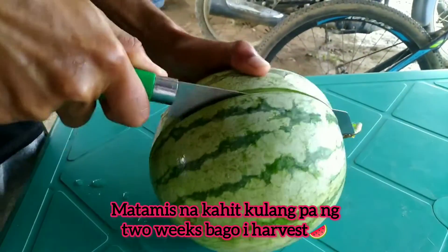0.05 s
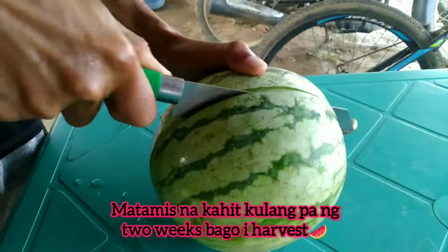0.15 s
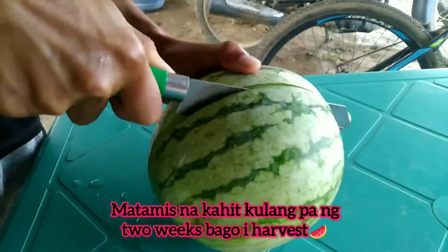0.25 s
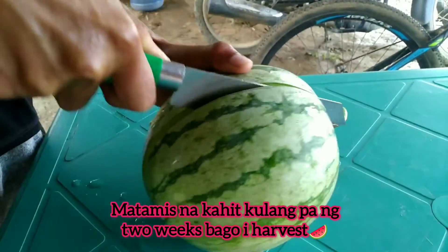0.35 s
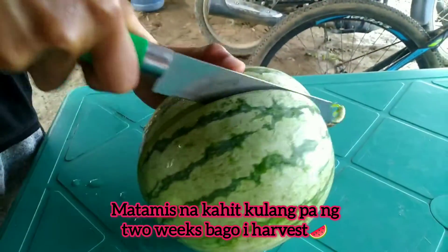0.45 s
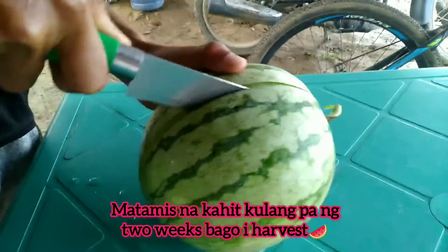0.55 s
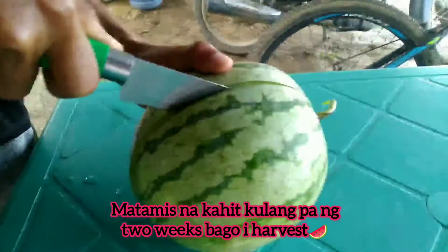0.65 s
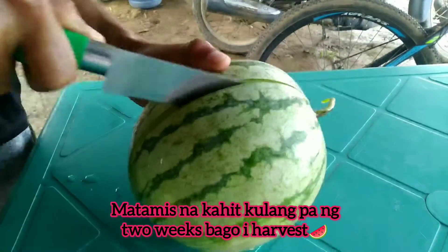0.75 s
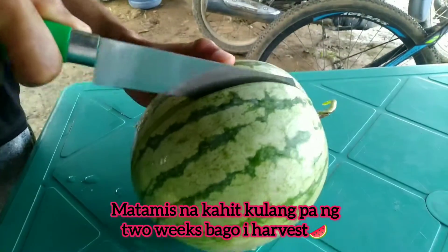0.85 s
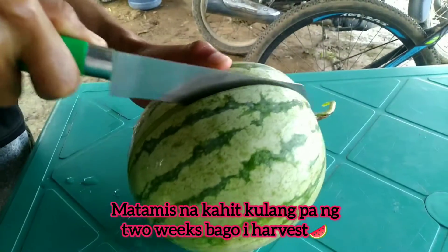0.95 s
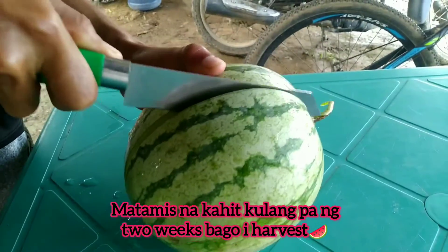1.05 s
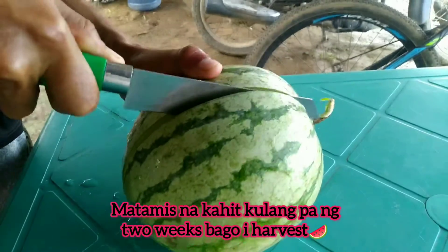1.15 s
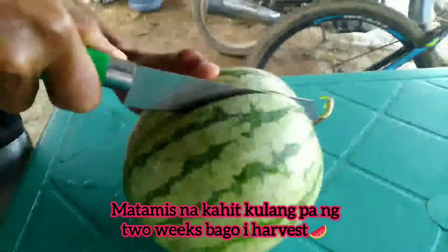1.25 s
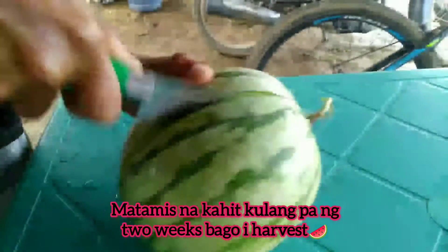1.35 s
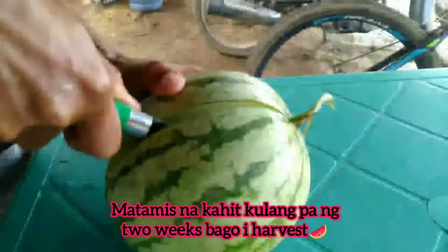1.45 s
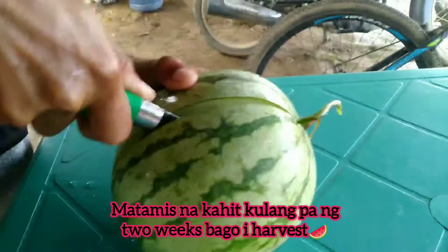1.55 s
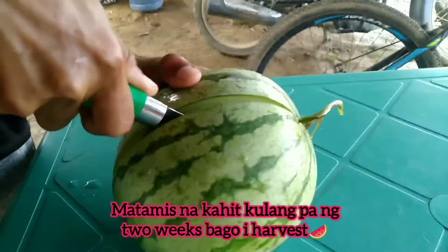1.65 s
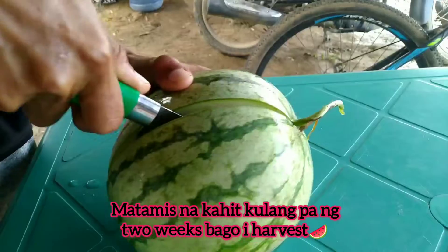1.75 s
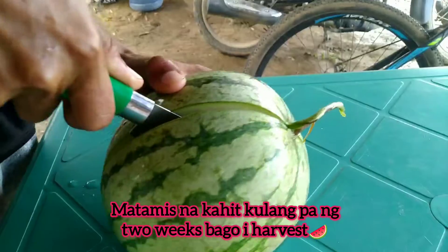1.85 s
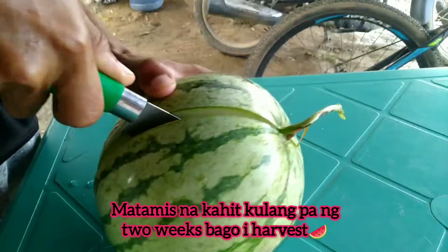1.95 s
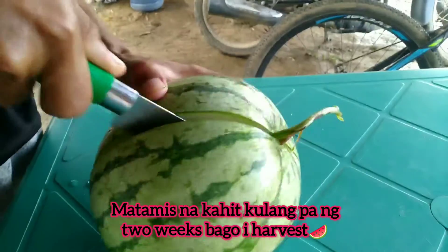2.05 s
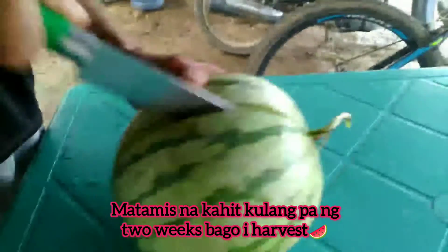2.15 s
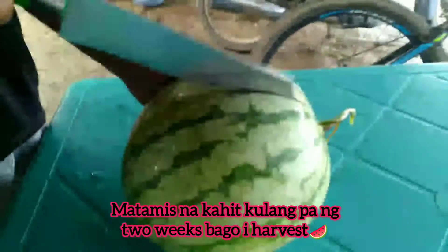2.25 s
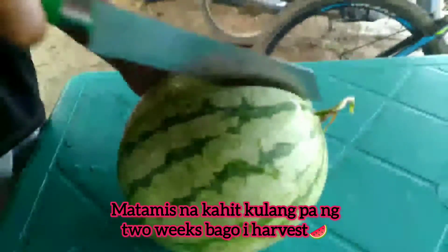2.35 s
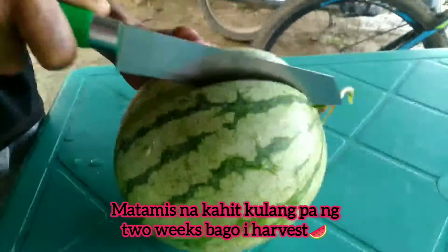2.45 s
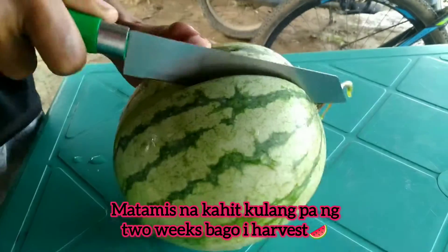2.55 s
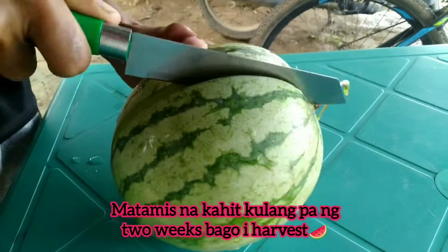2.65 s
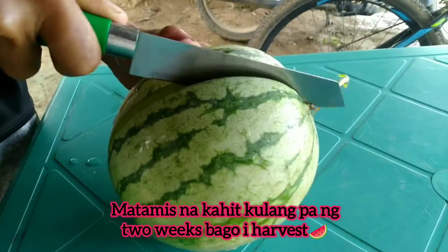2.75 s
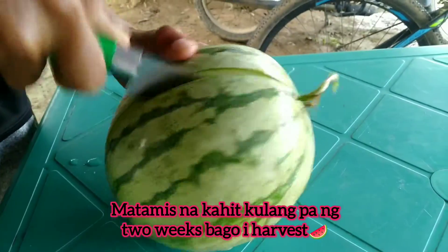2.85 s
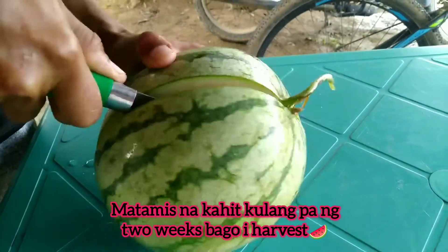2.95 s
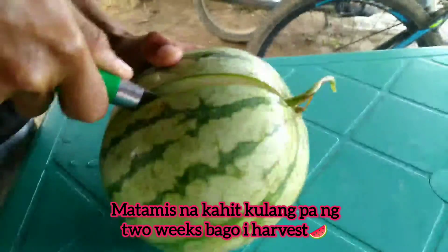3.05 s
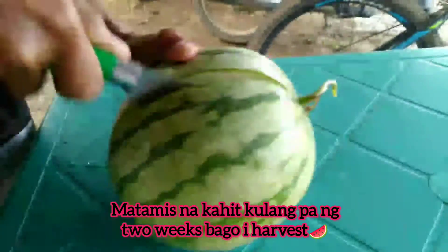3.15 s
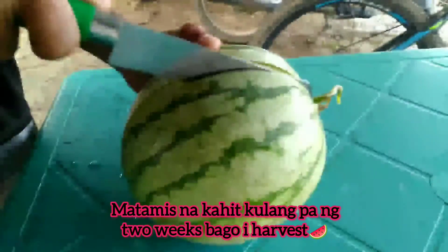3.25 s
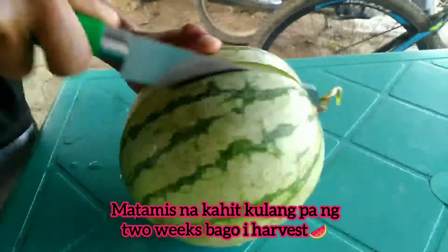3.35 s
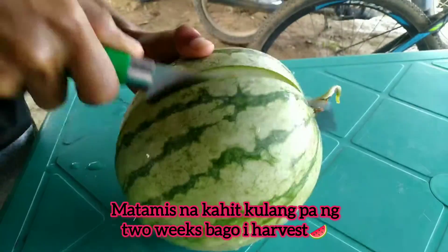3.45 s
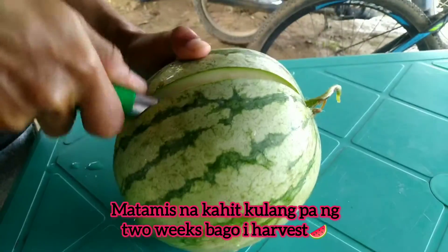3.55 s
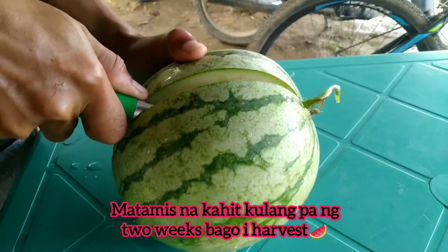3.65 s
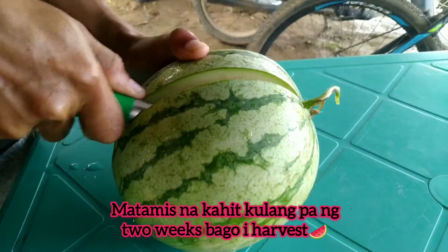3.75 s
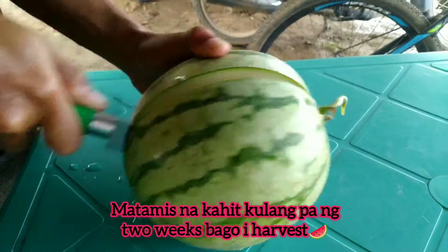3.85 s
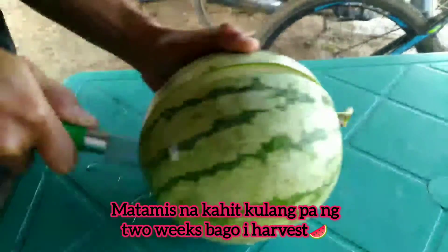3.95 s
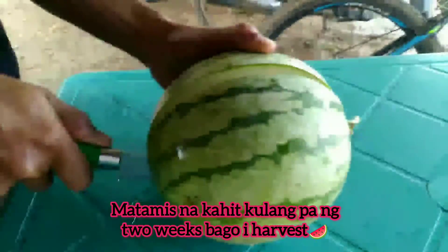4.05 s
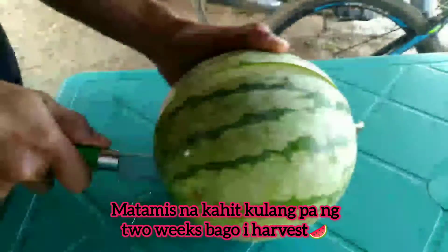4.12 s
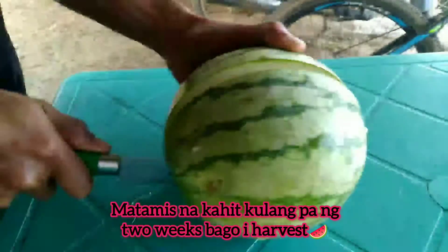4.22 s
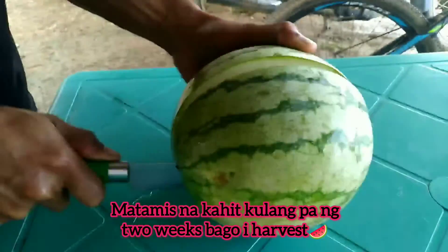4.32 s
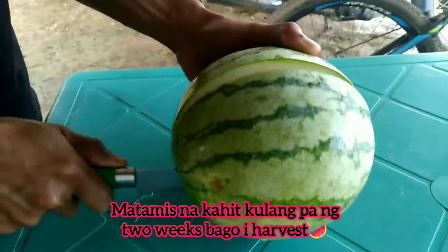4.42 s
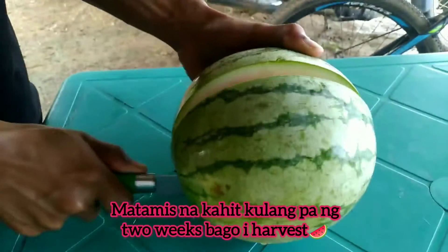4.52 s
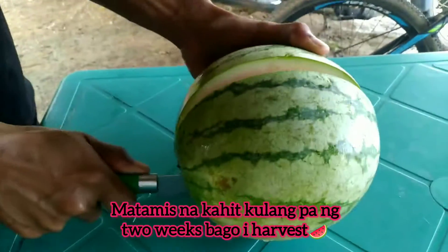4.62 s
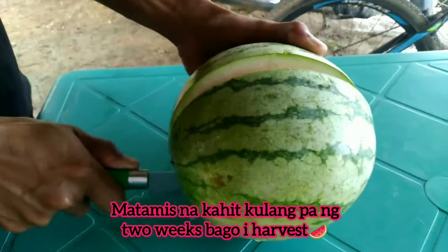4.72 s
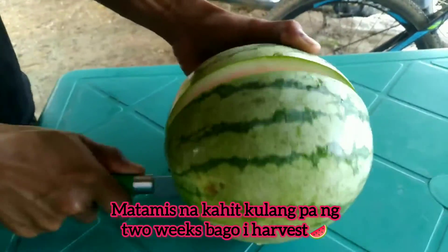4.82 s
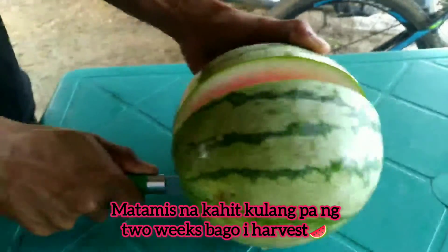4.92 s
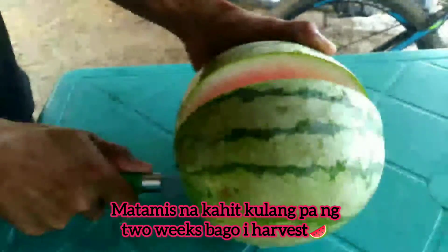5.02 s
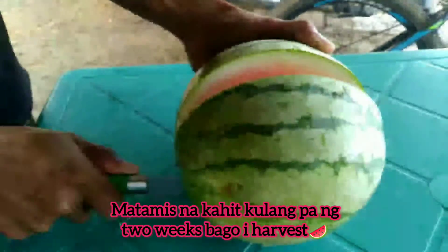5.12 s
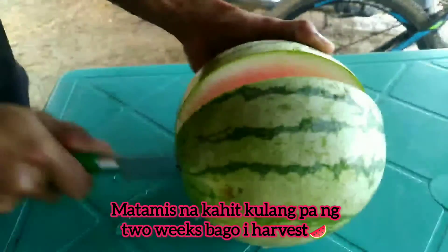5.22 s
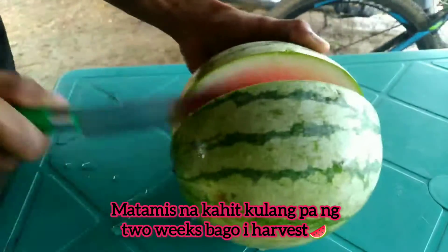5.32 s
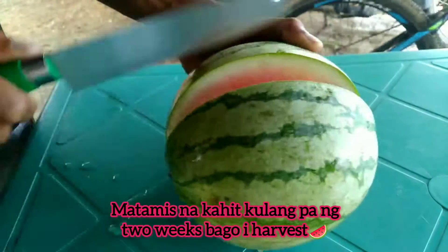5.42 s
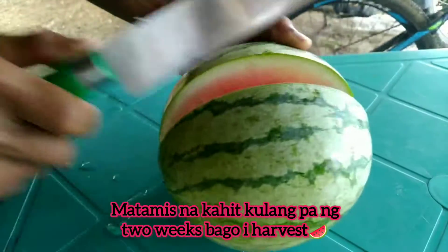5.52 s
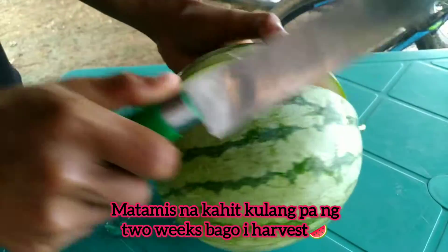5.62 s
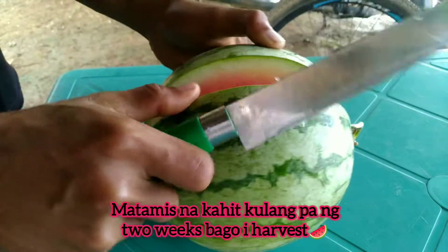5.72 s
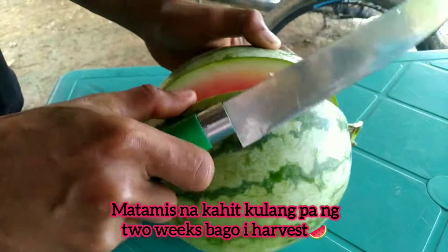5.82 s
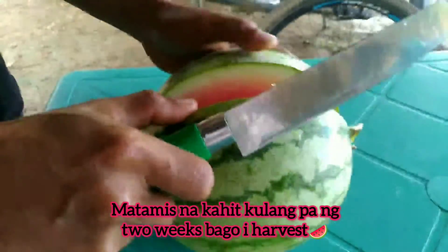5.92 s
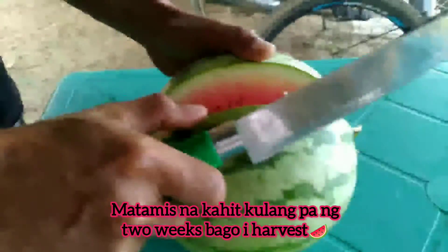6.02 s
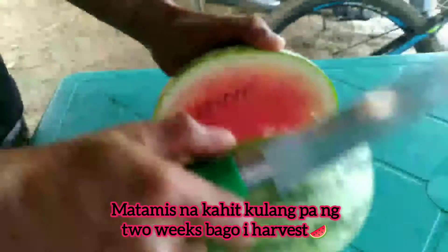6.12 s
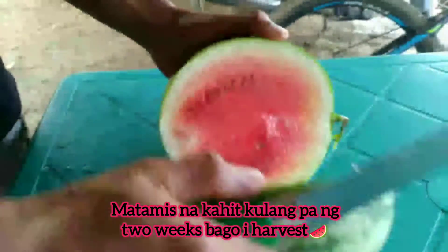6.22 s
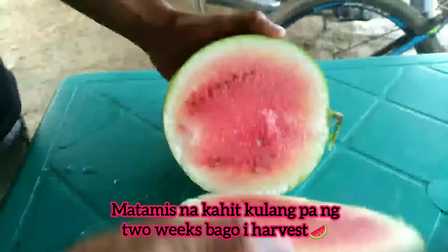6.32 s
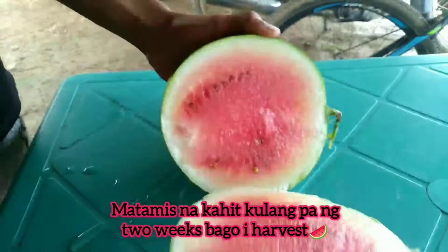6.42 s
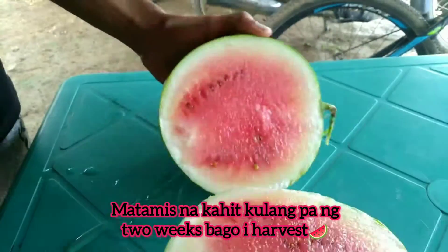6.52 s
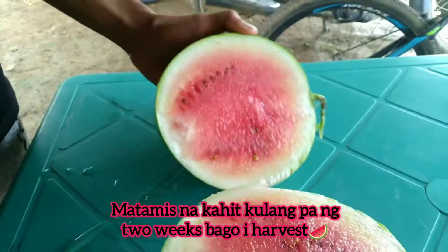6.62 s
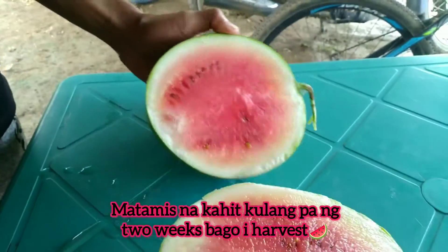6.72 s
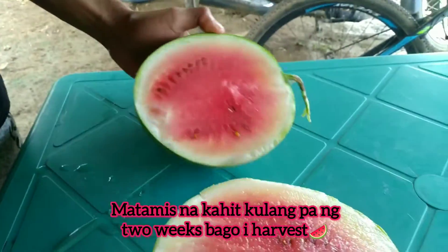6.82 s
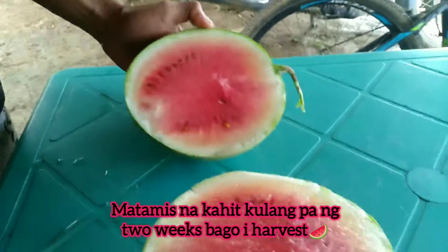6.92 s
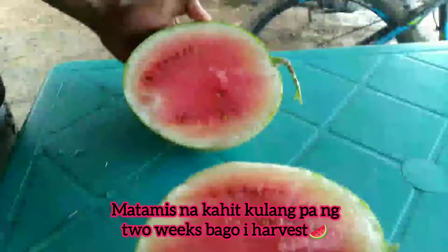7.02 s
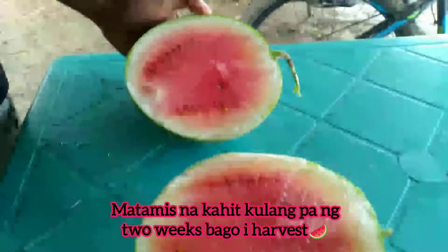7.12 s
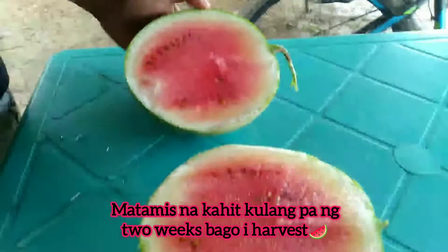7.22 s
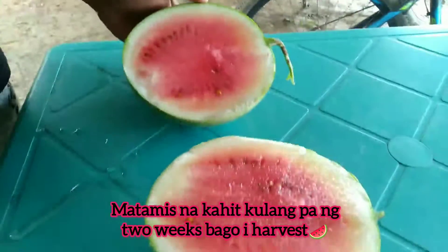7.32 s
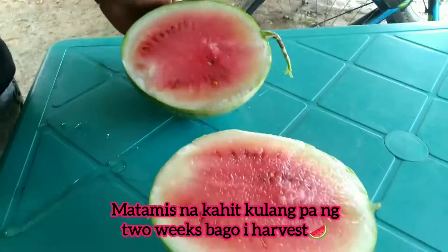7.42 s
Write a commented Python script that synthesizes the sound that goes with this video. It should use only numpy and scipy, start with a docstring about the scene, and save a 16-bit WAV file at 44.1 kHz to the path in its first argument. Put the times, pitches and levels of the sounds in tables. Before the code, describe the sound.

Close up, a kitchen knife rubs through a watermelon on a plastic table: faint scrapes, then crisp snaps and short wet crunches around one and a half and three seconds. Steadier soft rasping follows, then a long crackling split just after six seconds with hollow thuds and small wet ticks. A single-cylinder engine idles low in the distance under a porch, near stereo microphone.

```python
"""Under a porch roof, a kitchen knife is worked through a whole watermelon on a plastic table.
The blade rubs by stick-slip friction in the wet rind; swarms of fractures and single snaps open it,
and each crack excites the modes of fruit and table until the melon splits and the wet halves tick apart.
Some way off a single-cylinder engine idles as a sum of exhaust orders with clatter, behind it lies
the coloured noise of open air, and once a thin, faint sine whistles in the distance."""
import sys
import numpy as np
from scipy import signal
from scipy.fft import rfft, irfft
from scipy.io import wavfile
from scipy.ndimage import uniform_filter1d

SR = 44100
rng = np.random.default_rng(int(sys.argv[2]) if len(sys.argv) > 2 else 0)


def store_wav(level_fs):
    """Save 16-bit WAV to argv[1]."""
    pcm = np.round(np.clip(np.atleast_2d(level_fs), -1, 1) * 32767)
    wavfile.write(sys.argv[1], SR, pcm.T.astype(np.int16))


N = 329418

# A colour that leaves the spectrum unchanged. Each row: frequency in Hz, gain in dB.
FLAT = [(1000, 0)]
CUTOFF_HZ = 15800


def from_db(db):
    """Level and amplitude: 20 dB is a factor of ten in gain."""
    return 10 ** (np.asarray(db) / 20)


def rms_one(x):
    """Normalization: scale to rms 1."""
    return x / np.sqrt(np.mean(x ** 2) + 1e-20)


def band(x, hz, kind):
    """Butterworth filtering, from a second-order prototype."""
    return signal.sosfilt(signal.butter(2, hz, kind, fs=SR, output="sos"), x + 1e-18)


def colour(x, points, size=8192):
    """Minimum phase: folding the cepstrum makes a causal filter through (Hz, dB) points."""
    hz, db = np.transpose(points)
    grid = np.maximum(np.fft.rfftfreq(size, 1 / SR), 1)
    gain = from_db(np.interp(np.log(grid), np.log(hz), db))
    cepstrum = irfft(np.log(gain))
    cepstrum[1:size // 2] *= 2
    cepstrum[size // 2 + 1:] = 0
    response = irfft(np.exp(rfft(cepstrum)))
    return signal.oaconvolve(x, response)[:N]


def stereo(pair, points):
    """Decorrelation: mid and side come from unrelated signals and treble scattered by hand and table."""
    # Ratio of side to mid at the microphone ports. Each row: frequency in Hz, side minus mid in dB.
    widths = [(200, -19), (700, -8), (1300, -3), (2400, -1), (4400, 0)]
    scatter = rms_one(rng.standard_normal(SR // 200)) / np.sqrt(SR // 100)
    scattered_treble = band(signal.oaconvolve(pair[0], scatter)[:N], 1800, "high")
    side = scattered_treble + pair[1] * np.sqrt(.5)
    mid, side = colour(pair[0], points), colour(colour(side, widths), points)
    return np.array([mid + side, mid - side])


def drift(rate, count=4000):
    """Slow random fluctuation: straight lines join normal draws made rate times per second."""
    return np.interp(np.arange(N) / SR * rate, np.arange(count), rng.standard_normal(count))


def ring(force, hz, t60):
    """Damped resonance: a unit click sets a sine ringing from height 1."""
    r = from_db(-60 / (t60 * SR))
    w = 2 * np.pi * hz / SR
    return signal.lfilter([0, np.sin(w)], [1, -2 * r * np.cos(w), r * r], force + 1e-18)


def body(force):
    """Modal superposition: fruit and table answer a force with damped modes of alternating sign."""
    # Modes of melon and table top together. Each row: frequency in Hz, gain in dB, 60 dB decay in seconds.
    modes = [(87, 3.5, 0.028), (99.8, 3, 0.27), (148.7, -4, 0.28), (185, -1, 0.27), (226.4, 0.5, 0.23),
             (260, -5, 0.12), (322, -1.5, 0.16), (396, -12, 0.2), (662, -2.5, 0.055)]
    return sum((-1) ** k * from_db(db) * ring(force, hz, t60) for k, (hz, db, t60) in enumerate(modes))


def envelope(start, rise, hold, release_db_per_s, sag_db_per_s=0):
    """Growth and decay: a near-linear swell, a sagging hold, then an exponential release."""
    swell_power = 0.99
    age = np.maximum(np.arange(N) / SR - start, 0)
    swell = np.minimum(age / max(rise, .001), 1) ** swell_power
    sag_db = sag_db_per_s * np.clip(age - rise, 0, hold)
    release_db = release_db_per_s * np.clip(age - rise - hold, 0, 1)
    return swell * from_db(-sag_db - release_db)


def air(air_db=-54.0):
    """Broadband noise: filtering gives a distant outdoor rumble and a faint hiss."""
    # Spectrum of the open air. Each row: frequency in Hz, gain in dB per Hz.
    air_colour = [(50, -9.5), (100, 7.5), (200, 2.5), (320, -7), (700, -4), (1000, -11.5), (2000, -18),
                  (6500, -29), (10500, -24.5), (15500, -31)]
    return from_db(air_db) * rms_one(stereo(rng.standard_normal((2, N)), air_colour))


def whistle():
    """Pure tone: a thin far sine swells and fades over half a sine cycle."""
    start_s, length_s, level_db, pitch_hz = 6.6, 0.51, -71, 3600
    t = np.arange(N) / SR
    swell = np.sin(np.pi * np.clip((t - start_s) / length_s, 0, 1))
    return from_db(level_db) * swell * np.sin(2 * np.pi * pitch_hz * t)


def engine(throb=0.048, regular_db=0, load_db_per_hz=1.5):
    """Periodic excitation: one cylinder makes exhaust orders and clatter, louder as it runs faster."""
    # Course of the idling speed. Each row: time in seconds, firings per second.
    idle = [(0.0, 20.2), (0.421, 20.5), (1.541, 19.5), (1.869, 20.2), (2.678, 19.3), (5.6, 18.2),
            (5.931, 18.8), (7.47, 18.9)]
    # Exhaust orders from twice the firing rate upwards. Each entry: relative level in dB.
    exhaust_orders = [-61.5, -53.5, -51.5, -60.5, -57, -75.5]
    # Resonances of the clatter. Each row: frequency in Hz, width in Hz, relative level in dB.
    clatter_modes = [(436, 76, -64.5), (641, 49, -63)]
    rate = np.interp(np.arange(N) / SR, *np.transpose(idle))
    cycles = np.cumsum(rate) / SR + 0.012 * drift(18)
    turn = 2 * np.pi * cycles
    exhaust = 0
    for k, db in enumerate(exhaust_orders, 2):
        # the pipe delays the high orders, which smears each thump; each order wavers in level
        wave = np.cos(k * turn - 0.614 * k * k)
        exhaust = exhaust + np.sqrt(2) * from_db(db + drift(2.01)) * wave
    firings = rms_one(np.diff(np.floor(cycles), prepend=0).clip(0))
    puffs = rng.standard_normal((2, N)) * (1 + throb * np.cos(turn))
    force = puffs + from_db(regular_db) * firings
    clatter = 0
    for hz, width, db in clatter_modes:
        t60 = np.log(1000) / (np.pi * width)
        clatter = clatter + from_db(db) * rms_one(ring(force, hz, t60))
    level = from_db(load_db_per_hz * (rate - rate.mean()) + 1.6 * drift(12))
    return level * (exhaust + stereo(clatter, FLAT))


def porch(x):
    """Reverberation: weak, dull reflections from roof and ground differ at each port."""
    t60_s, level_db, low_hz, cut_hz, first_s = 0.083, -12.5, 155, 10200, .008
    t = np.arange(SR // 2) / SR
    noise = band(rng.standard_normal((2, len(t))), [low_hz, cut_hz], "band")
    tail = noise * from_db(-60 * t / t60_s) * (t > first_s)
    tail /= np.sqrt(np.sum(tail ** 2, axis=1, keepdims=True))
    return x + from_db(level_db) * signal.oaconvolve(x, tail, axes=1)[:, :N]


def knocking(knock_db=-46, thud_db=-2):
    """Forced vibration: the rocking fruit thuds for two soft cycles and wakes modes near that pitch."""
    # Fruit rocking on the table. Each row: start in seconds, relative push in dB, pitch of the push in Hz.
    knocks = [(1.338, -36.5, 138), (1.406, -27.5, 320), (1.455, -32.5, 203), (1.487, -32, 148),
              (1.616, -37.5, 262), (2.201, -42.5, 218), (2.294, -40.5, 223), (2.942, -26.5, 332),
              (2.972, -41, 153), (4.509, -36.5, 197), (4.598, -38, 175), (4.625, -36, 400),
              (4.922, -29, 200), (4.974, -37.5, 198), (6.069, -29, 225), (6.14, -26.5, 109),
              (6.169, -33.5, 125), (6.293, -30.5, 190), (6.8234, -36.5, 423)]
    force = np.zeros(N)
    for s, db, hz in knocks:
        t = np.arange(round(2 * SR / hz)) / SR
        i = round(s * SR)
        force[i:i + len(t)] += from_db(db) * np.sin(2 * np.pi * hz * t) * np.hanning(len(t))
    return from_db(knock_db) * body(force) + from_db(thud_db) * force


def ticking(tick_db=0, ring_s=0.0025, ring_db=-17, spray_s=0.024, spray_db=-37):
    """Impulsive release: a film of juice parts with one sharp click, a brief ring and a faint spray."""
    # Films of juice parting. Each row: start in seconds, relative strength in dB, pitch in Hz.
    ticks = [(0.2227, -11.5, 10700), (0.5807, -24, 11000), (0.796, -19, 5570), (4.508, -16.5, 11300),
             (4.521, -17.5, 11000), (6.733, -21, 11500), (6.7328, -29, 2430), (6.7714, -15.5, 8800),
             (6.843, -24, 10500), (6.943, -21, 2800)]
    t = np.arange(SR // 20) / SR
    decay = from_db(ring_db) * np.exp(-t / ring_s) + from_db(spray_db) * np.exp(-t / spray_s)
    out = np.zeros((2, N))
    for s, db, hz in ticks:
        pop = decay * rng.choice([-1, 1], (2, len(t)))
        pop[0, 0] = 1
        pop = band(pop, [hz / 1.5, min(hz * 1.5, CUTOFF_HZ)], "band")
        i = round(s * SR)
        out[:, i:i + len(t)] += from_db(db + tick_db) * pop / np.linalg.norm(pop[0])
    return stereo(out, FLAT)


def bursting_cells(per_s, spread_db):
    """Shot noise: two streams of random fractures of uneven size, levelled in short-time power."""
    sizes_db = spread_db * np.minimum(rng.exponential(1, (2, N)), 4)
    sizes = from_db(sizes_db) * rng.choice([-1, 1], (2, N))
    clicks = sizes * (rng.random((2, N)) < per_s / SR)
    return clicks / np.sqrt(uniform_filter1d(clicks ** 2, size=900, axis=1) + 1e-6)


def squelching(squelch_db=0, release_db_per_s=560):
    """Cavity collapse: juice pockets burst in a coarse swarm around the pitch of their gap."""
    # Wet flesh squeezed on the blade.
    # Each row: start in seconds, swell in seconds, relative level in dB, pitch in Hz.
    squelches = [(0.222, 0.023, -53, 1640), (1.482, 0.01, -36.5, 556), (1.609, 0.0038, -47, 910),
                 (2.868, 0.014, -34.5, 950), (2.89, 0.0062, -35, 400), (2.923, 0.01, -35.5, 825),
                 (4.26, 0.04, -51, 1280)]
    cells, out = bursting_cells(per_s=1300, spread_db=2.5), 0
    for start, swell, db, hz in squelches:
        juice = rms_one(band(cells, [hz / 1.4, hz * 1.4], "band"))
        out = out + from_db(db + squelch_db) * juice * envelope(start, swell, 0, release_db_per_s)
    return stereo(out, FLAT)


def snapping(crack_s=0.0015, tail_s=0.023, tail_db=-20, echo_s=.0057, echo_db=-10, crack_db=12,
             click_db=-1, ring_cycles=5.66, boom_db=-28, splinter_db=-4):
    """Dispersion: a bright click bounces off the table, and a woody crack bends the rind."""
    # Single snaps of the rind. Each row: start in seconds, relative levels of click and woody crack in dB.
    snaps = [(0.164,-38,-37), (0.243,-35,-37), (1.335,-19.5,-26), (1.4037,-33,-17), (1.6145,-60,-45),
             (2.1975,-21.5,-32.5), (2.868,-20,-42), (2.879,-16,-45), (2.9323,-28,-23.5), (2.942,-21.5,-20),
             (4.582,-28,-34.5), (4.9215,-22,-22), (4.974,-25.5,-30), (6.0415,-23,-16), (6.0684,-10.5,-17),
             (6.0945,-21,-15.5), (6.104,-18,-23), (6.1144,-22,-18.5), (6.142,-35,-15), (6.1698,-33,-17.5),
             (6.177,-22,-19.5), (6.2314,-38,-23.5), (6.2389,-37,-29), (6.2623,-34,-32), (6.2912,-30,-32.5)]
    # Spectrum of the snaps. Each row: frequency in Hz, gain in dB per Hz.
    snap_colour = [(450, -14), (2300, -4), (3300, -8), (5500, -2.5), (11000, -3), (15500, -10)]
    bend_lag_cycles = 1.2
    t = np.arange(SR // 12) / SR
    click = np.exp(-t / crack_s) + from_db(tail_db) * np.exp(-t / tail_s)
    click += from_db(echo_db) * (t > echo_s) * np.exp(-np.abs(t - echo_s) / (2 * crack_s))
    pitches = 450 * 2 ** np.arange(0, 3.5, .5)  # half-octave steps in Hz
    out, push = np.zeros((2, N)), np.zeros(N)
    for s, bright_db, woody_db in snaps:
        i = round(s * SR)
        splinters = rng.choice([-1, 1], (len(pitches) + 1, 2, len(t)))
        snap = from_db(bright_db + click_db) * band(click * splinters[-1], 3800, "high")
        for hz, grains in zip(pitches, splinters):
            # bending waves are slower at low pitch: the lows come later and last longer
            age = t * hz / ring_cycles
            wave = from_db(splinter_db) * grains * np.sqrt(age) * np.exp(-age)
            wave[:, round(bend_lag_cycles * SR / hz)] += grains[:, 0] * np.sqrt(.5 * SR / hz)
            snap += from_db(woody_db + crack_db) * band(wave, [hz / 1.25, hz * 1.25], "band")
        out[:, i:i + len(t)] += snap
        push[i] += from_db(woody_db + boom_db)
    return stereo(out, snap_colour) + body(push)


def slips(per_s, slip_s, jerk_db):
    """Stick and slip: at uneven moments the level leaps, then sinks back; rms 1."""
    kicks = (rng.random(N) < per_s / SR) * rng.uniform(0.34, 1, N)
    strain = signal.lfilter([1], [1, -np.exp(-1 / (slip_s * SR))], kicks + 1e-18)
    return rms_one(from_db(jerk_db * np.tanh(strain)))


def in_the_cleft(grains, shifts_per_s):
    """Moving resonance: as the contact shifts, each mode of the cut glides, swells and fades alone."""
    # Resonances of the cut. Each entry: frequency in Hz.
    cleft_modes = [840, 1160, 1780, 2350, 2700, 3050, 4700]
    # Spectrum of the cut. Each row: frequency in Hz, gain in dB per Hz.
    cut_colour = [(210, -26), (350, 4), (498, -7), (844, -1.5), (990, -25), (1120, -2), (1400, -7),
                  (2420, -2), (3620, -7.5), (4800, -4.5), (10400, -1.5), (13600, -2.5), (16000, -16.5)]
    width_hz = 147
    r = np.exp(-np.pi * width_hz / SR)
    out, n = grains, np.arange(N)
    for hz in cleft_modes:
        poles = [1, -2 * r * np.cos(2 * np.pi * hz / SR), r * r]
        rung = signal.lfilter([1 - r, 0, r - 1], poles, grains + 1e-18)
        # a varying reading time bends the pitch
        glide = n + SR * .03 / shifts_per_s * drift(shifts_per_s)
        gliding = np.array([np.interp(glide, n, x) for x in rung])
        out = out + gliding * from_db(2 + 6 * np.tanh(drift(shifts_per_s)))
    return stereo(out, cut_colour)


def two_registers(x, low_gain, high_gain, split_hz=4200):
    """Band splitting: coarse and fine grains each keep their own level."""
    low, high = band(x, split_hz, "low"), band(x, split_hz, "high")
    return low_gain * low / np.std(low.mean(0)) - high_gain * high / np.std(high.mean(0))


def tearing(crunch_db=-3, fizz_db=-1, boom_db=-1):
    """Fracture in jerks: a crack runs as a swarm of breaks, spends its strain and shakes the fruit."""
    # The rind tears open. Each row: start in seconds, gathering in seconds, running in seconds,
    # relative levels of crunch, fizz and boom in dB, low edge of the crackle in Hz.
    tears = [ (1.381, 0.025, 0.0073, -26.5, -32.5, -36, 230), (2.864, 0.017, 0.032, -43, -38, -39, 200),
             (2.916, 0.012, 0.0043, -34, -47.5, -43, 300), (6.075, 0.026, 0.15, -31, -35, -31, 1000),
             (6.27, 0.0069, 0.0032, -52, -48.5, -57, 1100)]
    sag_db_per_s, release_db_per_s = 58, 363
    boom_outlasts_s, boom_sag_db_per_s, boom_release_db_per_s = 0.011, 70, 214
    grains = bursting_cells(per_s=6400, spread_db=1.5) * slips(per_s=110, slip_s=.003, jerk_db=11)
    shake = body(grains[0])
    shake = shake / np.sqrt(uniform_filter1d(shake ** 2, size=1800) + 1e-9)
    fractures, out = in_the_cleft(grains, shifts_per_s=33), 0
    for start, rise, run, coarse_db, fine_db, low_db, lowest_hz in tears:
        crunch, fizz = from_db(coarse_db + crunch_db), from_db(fine_db + fizz_db)
        crackle = two_registers(band(fractures, lowest_hz, "high"), crunch, fizz)
        out = out + crackle * envelope(start, rise, run, release_db_per_s, sag_db_per_s)
        # the fruit shakes on a little longer than the crack runs
        shaking = envelope(start, rise, run + boom_outlasts_s, boom_release_db_per_s, boom_sag_db_per_s)
        out = out + from_db(low_db + boom_db) * shake * shaking
    return out


def rubbing(rasp_db=-2.5, hiss_db=-3.0, boom_db=0):
    """Stick-slip friction: the blade scrapes over wet cells, sags in level as it is gripped, stirs the fruit."""
    # Strokes of the blade and wet flesh sliding. Each row: start in seconds, speeding up in seconds,
    # full speed in seconds, relative levels of rasp and hiss in dB.
    strokes = [ (0.17, 0.071, 0.0073, -50.5, -48), (0.41, 0.078, 0.077, -63.5, -59),
               (0.565, 0.028, 0.062, -68, -49), (0.79, 0.005, 0.062, -64, -55.5),
               (1.278, 0.0051, 0.057, -82, -59), (1.93, 0.27, 0.006, -62.5, -53),
               (2.68, 0.036, 0.0074, -82, -54.5), (3.13, 0.069, 0.0065, -63, -55),
               (3.548, 0.014, 0.069, -53, -61.5), (3.847, 0.026, 0.079, -54, -48),
               (3.91, 0.12, 0.2, -51.5, -51.5), (4.22, 0.072, 0.038, -50, -54),
               (4.442, 0.059, 0.068, -45, -45.5), (4.79, 0.12, 0.072, -51.5, -58.5),
               (5.129, 0.13, 0.08, -62, -62.5), (6.77, 0.023, 0.02, -55, -73)]
    # Tint of the sliding blade: fuller below about 1.4 kHz, softer at the top.
    # Each row: frequency in Hz, gain in dB.
    rub_tint = [(1400, 6), (2100, 2), (5200, 2.5), (9000, -1.5)]
    sag_db_per_s, release_db_per_s = 33.5, 272
    power = 0
    for start, rise, hold, *levels in strokes:
        stroke = envelope(start, rise, hold, release_db_per_s, sag_db_per_s)
        power = power + np.outer(from_db(levels), stroke) ** 2
    rasp, hiss = np.sqrt(power)
    grains = bursting_cells(per_s=3600, spread_db=1.8) * slips(per_s=90, slip_s=.0035, jerk_db=7)
    boom = from_db(boom_db) * rasp * rms_one(body(grains[0]))
    scrape = np.array([colour(x, rub_tint) for x in in_the_cleft(grains, shifts_per_s=24)])
    scrape = scrape * from_db(1.3 * drift(35))
    return two_registers(scrape, rasp * from_db(rasp_db), hiss * from_db(hiss_db)) + boom


def scene():
    """Superposition: the cutting sounds close by, the engine and the open air behind it."""
    cutting = rubbing() + squelching() + tearing() + snapping() + ticking() + knocking()
    return porch(cutting) + engine() + air() + whistle()


def record(dry, notch_hz=7900, notch_width_hz=1400, notch_db=-14):
    """Linear filtering: the two ports differ in colour and share a treble dip; the top is cut."""
    # Colour difference of the ports. Each row: frequency in Hz, left minus right in dB.
    lean = [(60, -3), (600, -2.5), (1300, 2), (3500, 0.9), (8000, -2.5), (11000, -7)]
    dip = [(notch_hz - notch_width_hz, 0), (notch_hz, notch_db), (notch_hz + notch_width_hz, 0)]
    ports = []
    for x, sign in zip(dry, (1, -1)):
        port_colour = [(hz, sign * db / 2) for hz, db in lean]
        ports.append(colour(colour(x, port_colour), dip))
    return signal.sosfilt(signal.ellip(10, .2, 70, CUTOFF_HZ, fs=SR, output="sos"), ports)


dry = scene()
out = record(dry)
store_wav(out)
```